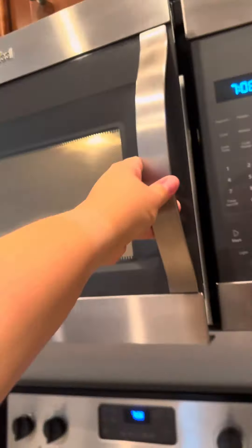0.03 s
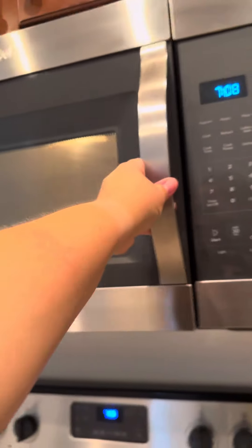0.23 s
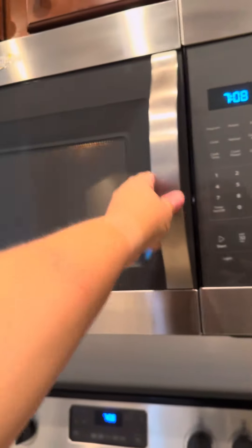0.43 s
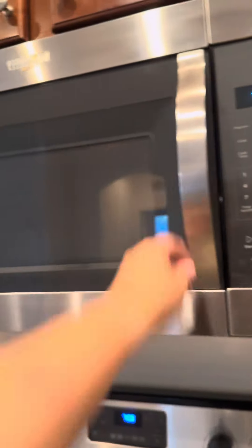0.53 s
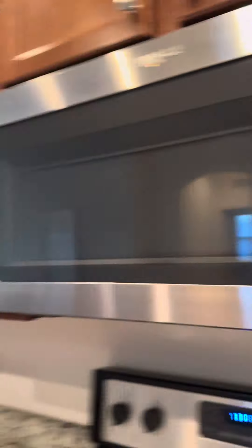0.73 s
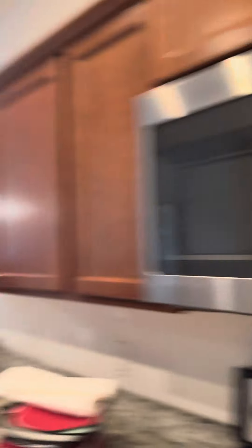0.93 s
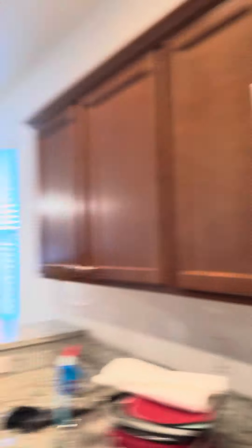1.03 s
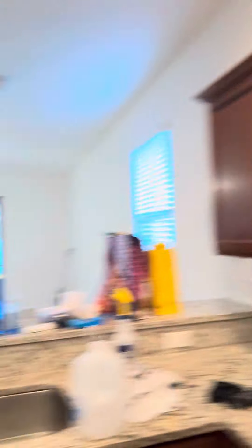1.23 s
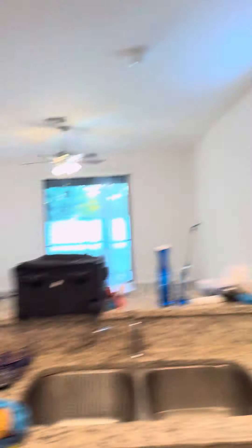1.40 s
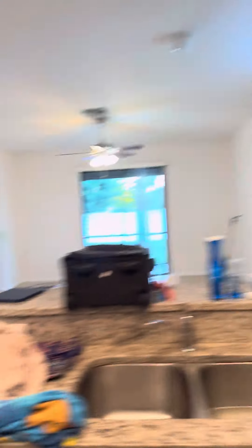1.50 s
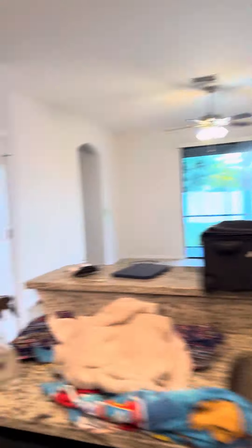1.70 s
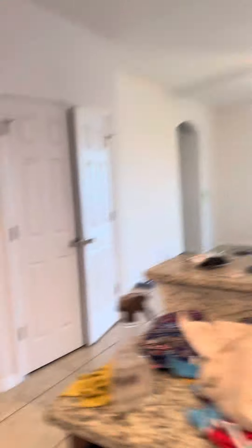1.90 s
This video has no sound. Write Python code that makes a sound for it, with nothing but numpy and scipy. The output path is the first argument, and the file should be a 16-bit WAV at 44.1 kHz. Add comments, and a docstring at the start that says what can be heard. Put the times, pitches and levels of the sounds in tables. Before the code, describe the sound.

A microwave door is pushed shut close by. At about 0.2 seconds the plastic latch knocks and scrapes, then snaps in at 0.3 with a louder clack and thud. The steel case's ring and the kitchen echo fade by about 1 second. From then until 2 seconds come soft, low microphone bumps, strongest near 1.2, with faint clothing rustle. Quiet room air and appliance hum continue throughout.

```python
"""A microwave door is pushed shut in a live kitchen. The latch hooks scrape and knock on their ramps,
ride over and snap in with plastic clicks; the door slams on the steel case, which rattles, booms
and rings. Then the hand-held microphone swings away with soft bumps and a rustle of clothes.
Room air and a quiet appliance hum lie under it all."""
import sys
import numpy as np
from scipy import signal
from scipy.fft import rfft, irfft, next_fast_len
from scipy.io import wavfile
from scipy.ndimage import uniform_filter1d

SR = 44100
rng = np.random.default_rng(int(sys.argv[2]) if len(sys.argv) > 2 else 0)


def int16_out(signal):
    """Quantize to a 16-bit WAV file."""
    q = np.round(np.clip(np.atleast_2d(signal).T, -1, 1) * 32767)
    wavfile.write(sys.argv[1], SR, q.astype(np.int16))


N = 85995


def undb(db):
    """Decibels to gain."""
    return 10 ** (np.asarray(db) / 20)


def unit(x):
    """Scale to rms 1."""
    return x / np.sqrt(np.mean(x ** 2))


def on_log(hz, points):
    """Read (Hz, value) points on a log-frequency axis."""
    freqs, values = np.array(points, float).T
    return np.interp(np.log(np.maximum(hz, 1)), np.log(freqs), values)


def colour(x, points):
    """Minimum-phase EQ through (Hz, dB) points."""
    size = 2 * next_fast_len(N)
    gain = undb(on_log(np.arange(size // 2 + 1) * SR / size, points))
    cepstrum = irfft(np.log(gain))
    cepstrum[1:size // 2] *= 2
    cepstrum[size // 2 + 1:] = 0
    return irfft(rfft(x, size) * np.exp(rfft(cepstrum)))[..., :N]


# Stereo width. Each row: frequency in Hz, side against mid in dB.
WIDTH = [(60, -17), (170, -19.5), (350, -10.5), (650, 1.5), (1400, -4), (2800, 1), (4300, -1.5),
         (7500, -5.5), (10000, 15)]
def noise():
    """Stereo noise, narrow in the bass and wide in the treble."""
    mid, side = rfft(rng.standard_normal((2, N)))
    width = undb(on_log(np.arange(len(mid)) * SR / N, WIDTH))
    return irfft(np.array([mid + width * side, mid - width * side]) / np.sqrt(1 + width ** 2), N)


def shaped_noise(eq):
    """Stereo noise through an EQ, at rms 1."""
    return unit(colour(noise(), eq))


def since(start):
    """Seconds since a moment, zero before it."""
    return np.maximum(np.arange(N) / SR - start, 0)


def fade(start, t60, rise=0.00028):
    """Envelope: a straight attack, then exponential decay."""
    t = since(start)
    return np.minimum(t / rise, 1) * np.exp(-np.log(1000) * np.maximum(t - rise, 0) / t60)


def ring(start, hz, t60, rise):
    """One damped mode."""
    return fade(start, t60, rise) * np.sin(2 * np.pi * hz * since(start))


def soften(x, hz):
    """A soft contact passes less treble."""
    return signal.sosfilt(signal.butter(1, min(hz, SR / 3), fs=SR, output="sos"), x)


def place(x, lag_s=0.00008, pan_db=0.8):
    """A source on the left reaches the right channel later and weaker."""
    late = np.interp(np.arange(N) - lag_s * SR, np.arange(N), x)
    return np.array([x * undb(pan_db / 2), late * undb(-pan_db / 2)])


# Room tone EQ. Each row: frequency in Hz, gain in dB.
AIR_EQ = [(20, -8.5), (50, 3.5), (100, -3.5), (200, -1.5), (370, -1.5), (655, -10.5), (1090, -18),
          (2130, -26.5), (3000, -32), (4150, -34.5), (9000, -63.5), (11500, -62), (15000, -66)]
def room_air():
    """A steady, dark bed of air."""
    return undb(-48.5) * shaped_noise(AIR_EQ)


# Hum fader moves. Each row: time in seconds, levels of the low, middle and high tone in dB.
HUM_LEVELS = [(0, -49, -92, -65), (0.6, -44, -69, -67.5), (0.951, -48.5, -56.5, -72),
              (1.25, -48.5, -48, -82), (1.898, -56.5, -54, -85)]
def appliance_hum(tones_hz=(126, 171.5, 1066), waver_depth=0.2):
    """Three wavering tones whose balance shifts as the microphone turns."""
    t = since(0)
    times, *levels = np.array(HUM_LEVELS).T
    hum = 0
    for hz, db in zip(tones_hz, levels):
        drift = unit(colour(rng.standard_normal(N), [(6, -20), (40, -83), (200, -120)]))
        hum += undb(np.interp(t, times, db)) * (1 + waver_depth * drift) * np.sin(2 * np.pi * hz * t)
    return hum


# Scrape envelope. Each row: time in seconds, level in dB.
SCRAPE_LEVELS = [(0.178, -84), (0.184, -53), (0.206, -34.5), (0.218, -37), (0.251, -46), (0.288, -37),
                 (0.301, -55)]
# Scrape EQ. Each row: frequency in Hz, gain in dB.
SCRAPE_EQ = [(150, 9.5), (400, 14.5), (1200, 7.5), (2200, 9), (3300, 4), (5000, -4.5), (7000, -0.5),
             (9000, -12), (11200, -23), (15000, -8)]
def hook_scrape(grain_db=0.5):
    """The hooks slide along their ramps with a little grit."""
    grain = unit(uniform_filter1d(rng.standard_normal(N), size=60))
    level_db = np.interp(since(0), *np.array(SCRAPE_LEVELS).T, left=-np.inf, right=-np.inf)
    return undb(level_db + grain_db * grain) * shaped_noise(SCRAPE_EQ)


# Latch clicks. Each row: start in seconds, relative level in dB.
CLICKS = [(0.183, -22), (0.2667, -17), (0.2825, -39), (0.2927, -4.5), (0.2985, -14), (0.3052, -20),
          (0.3171, -16.5), (0.336, -17)]
# Click EQ. Each row: frequency in Hz, gain in dB.
CLICK_EQ = [(300, -1), (1000, -12), (2200, -4), (3300, -16.5), (4200, -1.5), (4750, -10.5), (5500, -3.5),
            (6100, -10), (6800, -6.5), (8600, -11.5), (9700, -0.5), (11300, -29), (15000, -12)]
def latch_clicks():
    """The plastic latch clicks in tight, bright bursts."""
    envelope = sum(undb(db) * fade(start, t60=0.047) for start, db in CLICKS)
    return undb(-18.5) * envelope * shaped_noise(CLICK_EQ)


# Reverb decay. Each row: frequency in Hz, t60 in seconds.
ROOM_T60 = [(60, 0.54), (250, 0.77), (700, 1.54), (2000, 1.5), (4500, 1.17), (8500, 0.67)]
# Reverb return EQ. Each row: frequency in Hz, gain in dB.
ROOM_EQ = [(45, 1), (90, 0), (140, -5.5), (215, 2.5), (262, -3.5), (300, 0.5), (600, -2), (780, -5.5),
           (1100, -0.5), (1900, -4.5), (2700, -5.5), (4300, -4.5), (5100, -6.5), (6800, -2.5), (8500, -6.5)]
def kitchen_reverb(x, modal_share=0.35, predelay_s=0.0037):
    """Band by band, part of the tail rings at fixed room modes, part is a wash of the stored power."""
    edges_hz = 40 * 2 ** (np.arange(13) * 2 / 3)
    tail = 0
    for lo, hi in zip(edges_hz, edges_hz[1:]):
        band = signal.butter(4, (lo, hi), "bandpass", fs=SR, output="sos")
        send = signal.sosfilt(signal.butter(2, (lo, hi), "bandpass", fs=SR, output="sos"), x)
        decay = fade(predelay_s, on_log(np.sqrt(lo * hi), ROOM_T60), rise=0.0022)
        decay /= np.sqrt(np.sum(decay ** 2))
        stored = np.maximum(signal.fftconvolve(np.mean(send ** 2, axis=0), decay ** 2)[:N], 0)
        wash = np.sqrt(stored) * unit(signal.sosfilt(band, noise()))
        modes = signal.fftconvolve(decay * noise(), signal.sosfilt(band, x[:1]), axes=1)[:, :N]
        tail += np.sqrt(1 - modal_share) * wash + np.sqrt(modal_share) * modes
    return undb(-5.5) * colour(tail, ROOM_EQ)


# Hook hits. Each row: start in seconds, level in dB.
HOOK_HITS = [(0.202, -17.5), (0.2045, -30), (0.2967, -18), (0.2991, -22)]
# Hook modes. Each row: frequency in Hz, relative level in dB, t60 in seconds.
HOOK_MODES = [(1237, -12, 0.03), (1637, -11.5, .012), (1806, -3, 0.022), (2080, -9, .022),
              (2360, -9, 0.0046)]
def hook_knocks():
    """The hooks knock on their ramps, bounce, and later drop into the catch."""
    return place(sum(undb(db + mode_db) * ring(start, hz, t60, rise=0.0007)
                     for start, db in HOOK_HITS for hz, mode_db, t60 in HOOK_MODES))


# Door blows on the case. Each row: start in seconds, relative level in dB, low-pass cutoff in Hz.
DOOR_BLOWS = [(0.214, -8, 1000), (0.262, -25.5, 400), (0.279, -18, 1520), (0.2933, -3.5, 1680),
              (0.2989, -5.5, 1490), (0.3066, -5, 550), (0.3181, -9.5, 600), (0.337, -16.5, 350)]
# Panel EQ. Each row: frequency in Hz, gain in dB.
PANEL_EQ = [(70, -11), (160, 6.5), (220, 2), (262, -5), (315, -4), (650, 2), (800, -9), (930, -1.5),
            (1150, -13), (1800, -18), (3000, -12), (8000, -36)]
def panel_rattle(diffuse_share=0.47):
    """Each blow rattles the dense panel modes; part of the sound arrives from all sides."""
    direct = np.sqrt(1 - diffuse_share) * place(rng.standard_normal(N))
    diffuse = np.sqrt(diffuse_share) * noise()
    panel = undb(-15) * unit(colour(direct + diffuse, PANEL_EQ))
    return sum(undb(db) * soften(panel * fade(start, t60=0.097), hz) for start, db, hz in DOOR_BLOWS)


# First contact and slam. Each row: start in seconds, level in dB, low-pass cutoff in Hz.
CASE_HITS = [(0.2173, -32, 130), (0.3, -22.5, 700)]
# Steel case modes. Each row: frequency in Hz, relative level in dB, t60 in seconds.
CASE_MODES = [(127.7, -2, 0.35), (170.4, -2, .58), (213.5, 2, 0.28), (322.2, -0.5, 0.32), (468, -2, 0.26),
              (618, -5.5, .3), (775, -15, 0.59), (876, -22, 0.42), (932, -10.5, 0.32), (1109, -6.5, 0.17),
              (1217, -13.5, .5), (1670, -11, .3), (2320, -14, 0.26), (4603, -18, 0.3)]
def case_ring():
    """The steel rings on after both hits; the gentle first contact stirs mainly its low modes."""
    rings = 0
    for start, db, cutoff_hz in CASE_HITS:
        modes = sum(undb(mode_db) * ring(start, hz, t60, rise=0.004) for hz, mode_db, t60 in CASE_MODES)
        rings += undb(db) * soften(modes, cutoff_hz)
    return place(rings, lag_s=0.0002, pan_db=1.5)


# Low-end weight. Each row: start in seconds, level in dB, pitch in Hz, t60 in seconds.
BOOMS = [(0.2196, -19, 100.5, 0.072), (0.3031, -5.5, 98, 0.07)]
def box_boom():
    """The whole box booms as the door seats."""
    return place(sum(undb(db) * ring(start, hz, t60, rise=0.004) for start, db, hz, t60 in BOOMS))


def spring_snap():
    """The latch spring snaps home with a tiny ping."""
    return place(undb(-16) * ring(start=0.2953, hz=4103, t60=0.011, rise=0.0007))


# Handling bumps. Each row: start in seconds, level in dB, pitch in Hz, attack and t60 in seconds.
BUMPS = [(1.001, -28.5, 48.3, 0.066, 0.24), (1.196, -20, 84, 0.0049, 0.16), (1.256, -25, 85.2, 0.013, 0.1),
         (1.301, -35, 80, 0.0092, 0.067), (1.363, -31, 84, 0.0054, 0.12), (1.457, -33, 73.6, 0.0046, 0.12),
         (1.49, -39, 76, 0.0067, .12), (1.6, -33.5, 65, 0.053, 0.1), (1.765, -36.5, 61.2, 0.011, 0.28),
         (1.925, -41, 64, .015, .15)]
# Rumble EQ. Each row: frequency in Hz, gain in dB.
RUMBLE_EQ = [(25, -29.5), (55, 14.5), (110, 2.5), (220, -31), (600, -37), (2000, -37), (8000, -84.5)]
def microphone_bumps(sag_share=0.2):
    """The hand bumps the microphone: dull thuds that sag in pitch, each with some loose rumble."""
    rumble = undb(-8) * shaped_noise(RUMBLE_EQ)
    bumps = 0
    for start, db, hz, rise, t60 in BUMPS:
        t = since(start)
        pitch = hz * (1 - sag_share * np.minimum(t / (rise + t60 / 4), 1)) * (t > 0)
        thud = np.sin(2 * np.pi * np.cumsum(pitch) / SR)
        bumps += undb(db) * fade(start, t60, rise) * (thud + rumble)
    return bumps


# Rustle envelope. Each row: time in seconds, level in dB.
RUSTLE_LEVELS = [(0, -74), (1.11, -73.5), (1.15, -63.5), (1.2, -68), (1.223, -56.5), (1.33, -67.5),
                 (1.45, -72.5), (1.63, -64.5), (1.8, -66.5), (1.94, -58.5)]
# Cloth EQ. Each row: frequency in Hz, gain in dB.
RUSTLE_EQ = [(300, -7.5), (1500, 1.5), (3000, -0.5), (4500, -2.5), (8500, -4.5), (11500, -8.5), (15000, -9)]
def cloth_rustle():
    """Clothes brush in faint swells as the microphone swings round."""
    return undb(np.interp(since(0), *np.array(RUSTLE_LEVELS).T)) * shaped_noise(RUSTLE_EQ)


# Grip noises. Each row: start in seconds, level in dB, centre in Hz, attack and t60 in seconds.
SCUFFS = [(1.618, -55, 9000, 0.0015, 0.026), (1.771, -57, 2000, 0.0013, 0.014), (1.9, -48, 430, 0.035, 0.3),
          (1.906, -68, 1820, 0.028, .4)]
def grip_scuffs():
    """The grip ticks and scuffs, each time in one broad band of noise."""
    scuffs = 0
    for start, db, hz, rise, t60 in SCUFFS:
        eq = [(hz / 2, -12), (hz, 0), (hz * 2, -15), (hz * 10, -50)]
        scuffs += undb(db) * fade(start, t60, rise) * shaped_noise(eq)
    return scuffs


def scene():
    """Latch and door feed the reverb; case ring, handling and background stay dry."""
    background = room_air() + appliance_hum()
    latch = hook_scrape() + latch_clicks() + hook_knocks() + spring_snap()
    closing = latch + panel_rattle() + box_boom()
    handling = microphone_bumps() + cloth_rustle() + grip_scuffs()
    return background + closing + kitchen_reverb(closing) + case_ring() + handling


def record(dry, low_cut_hz=40.6, top_hz=16300):
    """A low cut drops the deepest rumble; a steep high cut trims the top."""
    dry = signal.sosfilt(signal.butter(2, low_cut_hz, "highpass", fs=SR, output="sos"), dry)
    return signal.sosfilt(signal.ellip(8, .2, 70, top_hz, fs=SR, output="sos"), dry)


dry = scene()
out = record(dry)
int16_out(out)
```